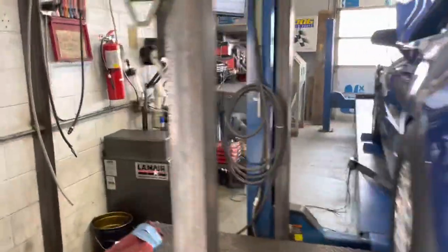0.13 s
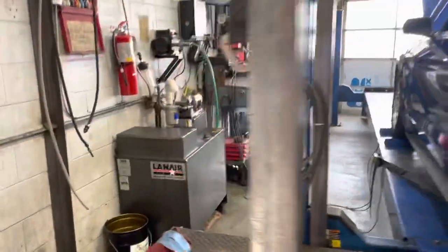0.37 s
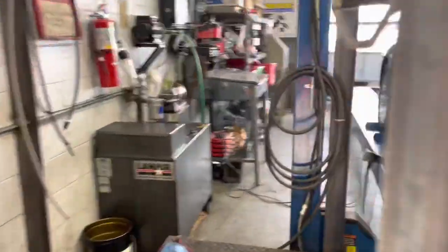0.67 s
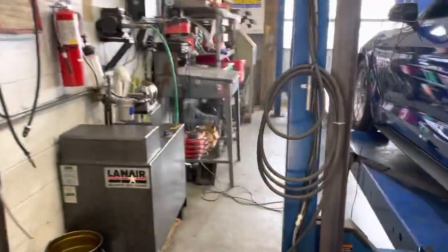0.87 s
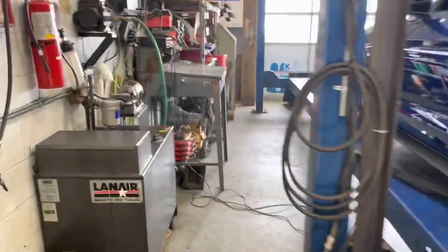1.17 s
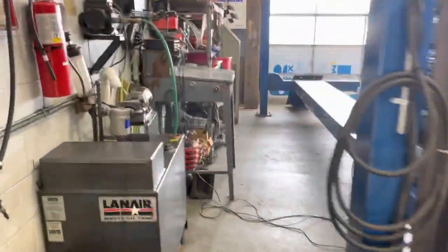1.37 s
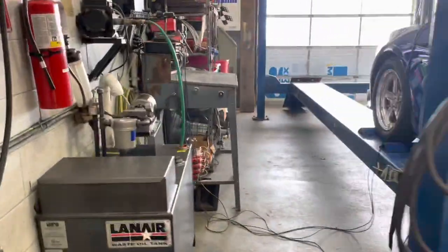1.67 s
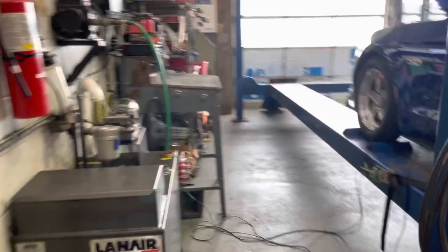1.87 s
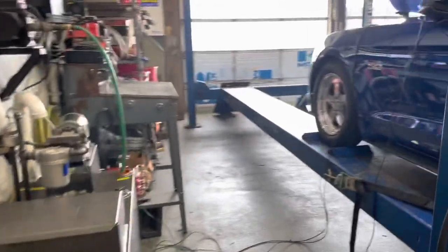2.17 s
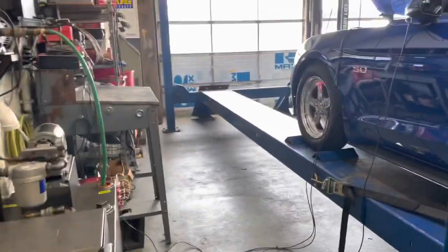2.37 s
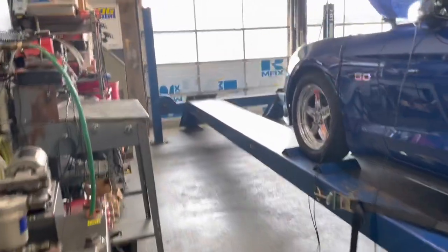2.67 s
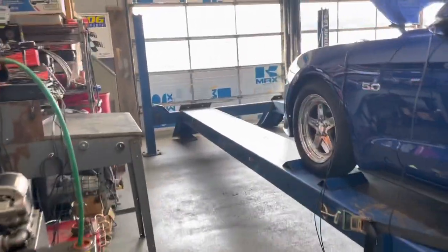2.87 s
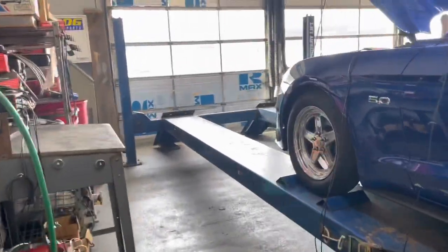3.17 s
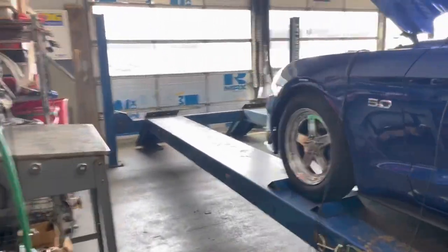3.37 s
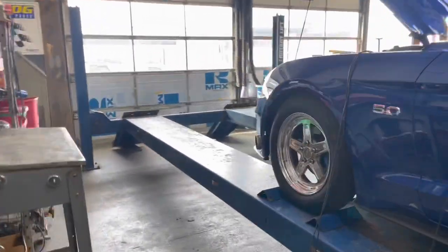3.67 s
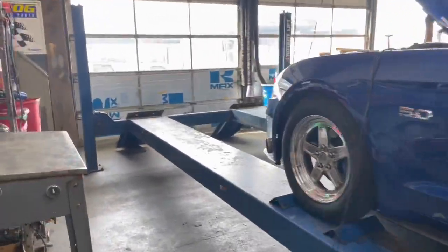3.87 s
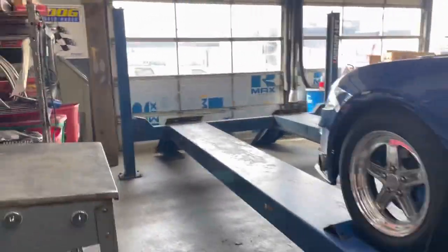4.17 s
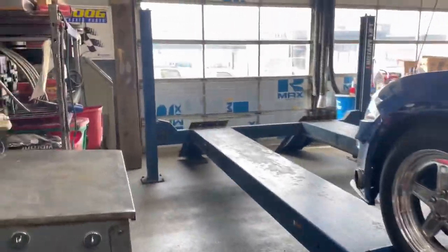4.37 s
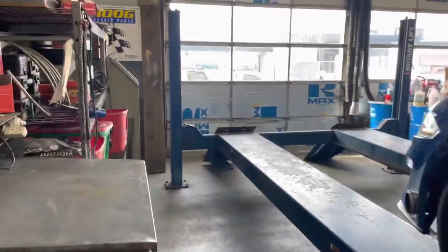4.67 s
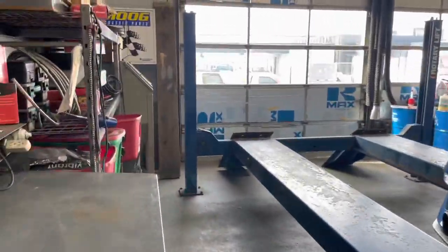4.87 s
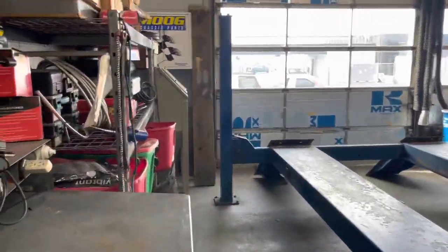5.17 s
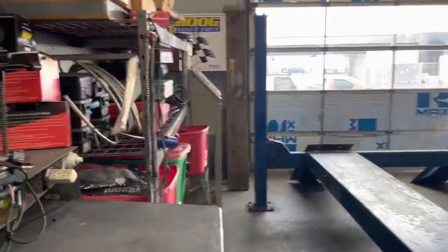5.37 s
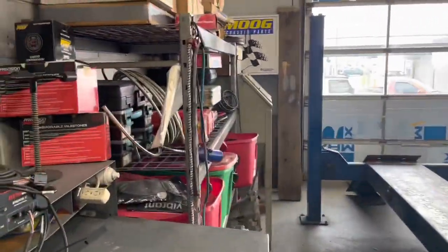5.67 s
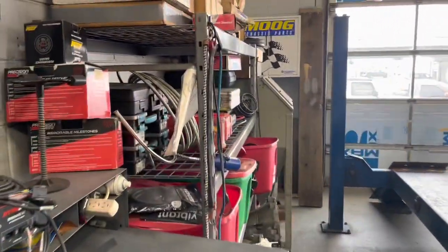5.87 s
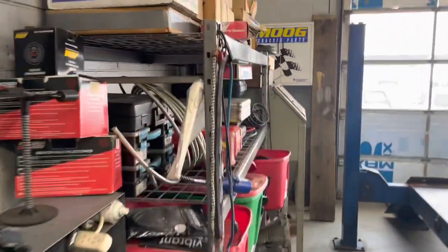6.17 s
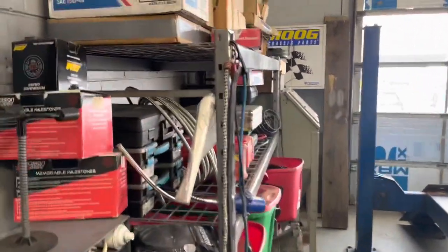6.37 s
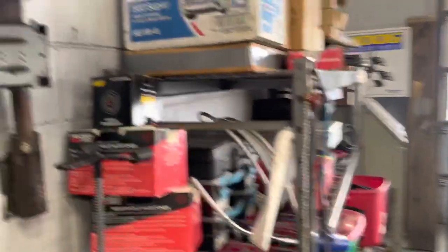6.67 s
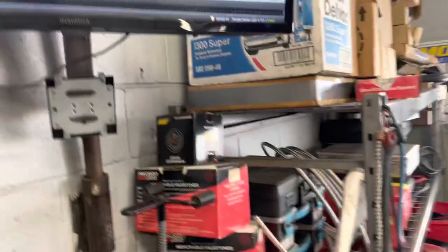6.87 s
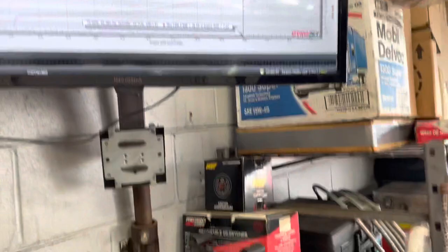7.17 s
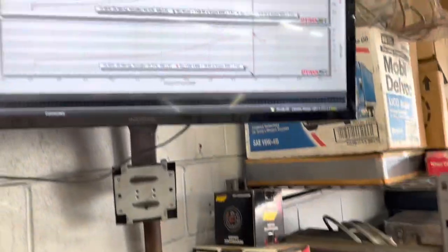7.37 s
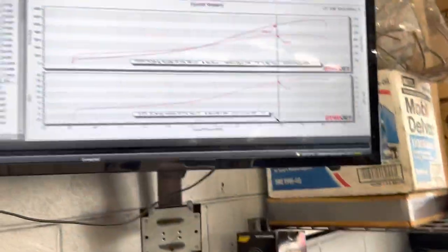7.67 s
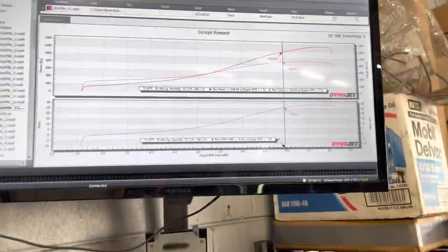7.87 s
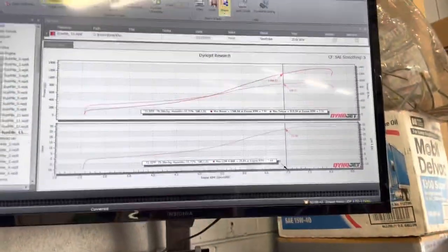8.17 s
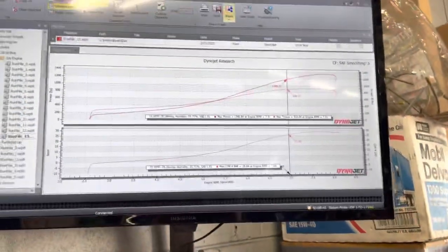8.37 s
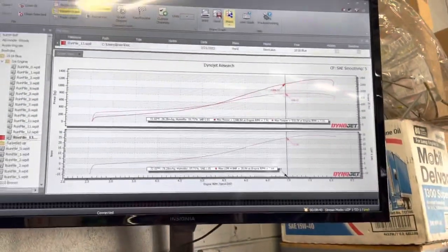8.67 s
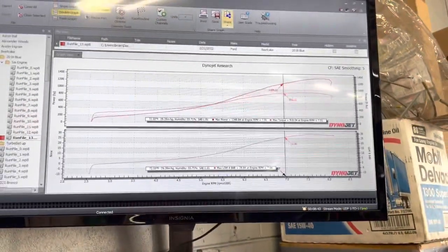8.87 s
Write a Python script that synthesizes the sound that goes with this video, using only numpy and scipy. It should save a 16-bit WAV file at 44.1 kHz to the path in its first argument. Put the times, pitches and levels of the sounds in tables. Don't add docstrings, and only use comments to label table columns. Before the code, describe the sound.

Handheld stereo microphone walking through a reverberant garage: low, lumpy V8 idle with a soft mechanical rush and faint steady fan tones. Compressed air vents sharply near the start and fades over a few seconds. The bass gradually strengthens, tiny bright ticks scatter, the engine revs slightly with a firm knock nearby, then falls back to a deep, loud burble and one late dull knock.

```python
import sys
import numpy as np
from scipy import signal
from scipy.fft import rfft, irfft, next_fast_len
from scipy.io import wavfile

SR = 44100
rng = np.random.default_rng(int(sys.argv[2]) if len(sys.argv) > 2 else 0)


def boost(x):
    u = np.asarray(x, float) / 20
    return 10 ** u


def file_out(sig):
    cols = np.atleast_2d(sig).T
    lim = np.clip(cols, -1, 1)
    pcm = np.round(lim * 32767).astype(np.int16)
    wavfile.write(sys.argv[1], SR, pcm)


N = 398223
T = np.arange(N) / SR
TURN_S = (4.2, 5.4)
IDLE_PER_S = 7.3


STRONG_ORDERS = [5, 8, 11, 16, 19, 21, 24, 27, 32]
# facing level/dB, turned away level/dB
ORDER_SIDES = [(-33, -26.5), (-36, -23), (-30, -13), (-15.5, -6), (-9.5, -7), (-6, -5), (-2, -3),
               (-2.5, -17), (-18, -18.5)]
# t/s, lag/rad
SIDE_LAG = [(0, 1.7), (2.7, 2.7), (3.2, 1.8), (4.3, 1.95), (4.8, 2.5), (9.03, 3.35)]


def exhaust_orders(cycles, levels_db):
    mid, side = 0, 0
    lag = in_time(SIDE_LAG)[0]
    turned = np.interp(T, TURN_S, [0, 1])
    pattern = np.angle(np.fft.fft(np.sign(CYLINDERS) + .5))
    for order, db, (facing_db, away_db) in zip(STRONG_ORDERS, levels_db, ORDER_SIDES):
        smear = .007 * order ** 2
        wander = .35 * drift(.3) + .08 * drift(4.0)
        angle = 2 * np.pi * order * cycles + pattern[order % 8] + smear + wander
        line = np.sqrt(2) * boost(db - 0.63 + 0.78 * drift(21.0))
        side_db = facing_db + turned * (away_db - facing_db)
        mid = mid + line * np.cos(angle)
        side = side + line * boost(side_db) * np.cos(angle - lag)
    return ports(mid, side)


# t/s, place along the shop [m], exhaust level/dB
WALK = [(0.0, 0.8, -11.5), (0.6, 1.15, -9.5), (1.3, 1.96, -3), (2.0, 1.92, -4), (2.8, 2.6, -6.5),
        (3.5, 3.26, -4.5), (4.3, 3.93, -2), (4.9, 4.72, 0.3), (5.5, 5.12, 1.4), (6.2, 5.39, 1.6),
        (6.6, 6.06, 0.5), (7.0, 6.67, 6.5), (7.3, 6.84, 10), (7.65, 6.84, 10.5), (8.0, 6.84, 7.5),
        (8.3, 6.81, 7.5), (8.7, 6.86, 10.5), (9.03, 6.84, 12)]
# f/Hz, width f/Hz, level/dB over direct, half wave along the walk [m], a crest at [m]
ROOM_MODES = [(41.1, 3.2, 22.5, 4.07, 5), (51.7, 7.2, 24.5, 4.457, -0.09), (71.9, 11.8, 22.5, 4.19, -8),
              (82.3, 7.3, 21.5, 1.83, -1.32), (106, 5.47, 23, 2.11, -0.37), (135.1, 7, 17, 2.337, 1.2),
              (138.4, 16, 13, 4.4, 4.5), (169.6, 8.2, 21.46, 2.803, 3), (178.23, 18.5, 24, 5.99, 5.5),
              (184.1, 33.9, 25, 6.02, -0.7), (199, 30, 13.5, 2.078, -1.32),
              (250.3, 22.2, 15.5, 2.626, -2.5)]
# order [multiples of the cycle rate], level/dB
DIRECT = [(5.0, -51.5), (8.0, -43), (11.0, -53.5), (16.0, -31.5), (19.0, -38.0), (21.0, -44), (24.0, -46),
          (27.0, -44.5), (32.0, -42.5)]


def standing_waves(speed):
    hop = 200
    place, gain_db = (c[::hop] for c in in_time(WALK))
    levels_db = []
    for order, db in DIRECT:
        hz = order * speed[::hop]
        field = 1
        for mode_hz, width, lift_db, half, crest in ROOM_MODES:
            shape = np.cos(np.pi * (place - crest) / half)
            field = field + boost(lift_db) * shape / (1 + 2j * (hz - mode_hz) / width)
        heard_db = db + gain_db + 20 * np.log10(np.abs(field) + 1e-3)
        levels_db.append(np.interp(T, T[::hop], heard_db))
    return levels_db


CYLINDERS = [0.85, -0.58, -1.134, 0.6, -1.106, 1.356, 0.59, -0.81]


def firings(cycles, rough):
    count = np.floor(8 * cycles).astype(int)
    at = np.flatnonzero(np.diff(count)) + 1
    clicks = np.zeros(N)
    clicks[at] = np.array(CYLINDERS)[count[at] % 8] + rough * rng.standard_normal(800)[:len(at)]
    return clicks


# t/s, level/dB, growl above 230 Hz level/dB
BURBLE = [(0, -38, -5.5), (.8, -32.5, -4.5), (1.3, -29.5, -11), (2.4, -21.5, -20), (2.7, -23, -14.5),
          (3.6, -21.5, -11.5), (4.3, -24, -5), (4.85, -16.5, -11.5), (5.6, -10.5, -23), (6.2, -9, -30),
          (6.5, -6, -24.5), (7.1, -10.5, -21.5), (7.5, -13.5, -20.5), (8.2, -12, -23.5), (9.03, -12.5, -23)]
# f/Hz, level/dB per Hz
BURBLE_COLOUR = [(20, -60), (32, -26), (60, -10.5), (95, -13), (130, 0), (200, 2), (250, -1.5), (330, -7.5),
                 (400, -14), (440, -24.5), (500, -23.5), (580, -32.5), (800, -60.5)]
# f/Hz, level/dB
BURBLE_SIDE = [(30, -27), (60, -18), (130, -1), (250, 0), (500, 23), (1200, -4.5)]
BURBLE_TOP_DB, BURBLE_SIDE_DB = 1.5, (-12.5, -5.5)
TAILPIPE_HIDDEN_S, TAILPIPE_HIDDEN_DB = (3.9, 4.3, 5.7, 6.2), (0, -15, -15, -7)
BASS_DB, BASS_FOLLOWS = -23, 0.38


def burble(clicks):
    low_db, growl_db = in_time(BURBLE)
    hidden_db = np.interp(T, TAILPIPE_HIDDEN_S, TAILPIPE_HIDDEN_DB)
    bass_db = BASS_DB + BASS_FOLLOWS * (low_db - low_db.mean())
    top_db = in_time(BAY)[0] + BURBLE_TOP_DB + hidden_db
    levels_db = (bass_db, low_db, low_db + growl_db, top_db)
    side_db = np.interp(T, TURN_S, BURBLE_SIDE_DB)
    uneven = clicks - .9 * np.sign(clicks)
    clicks = 1.6 * split(uneven, 250)[0] + split(clicks, 250)[1]

    def in_room():
        return rms_one(walking_room(clicks, t60=0.35, count=9)) + 0.18 * rms_one(clicks)

    mid, own = in_room(), in_room()
    trims_db = [-13, -11.5, -1.5, -2.5]
    out = []
    for field, spectra in ((mid, [BURBLE_COLOUR]), (own - 0.14 * mid, [BURBLE_COLOUR, BURBLE_SIDE])):
        bands = split(colour(field, *spectra), 105, 228.7, 437)
        out.append(sum(boost(db + trim) * rms_one(b) for db, trim, b in zip(levels_db, trims_db, bands)))
    return ports(out[0], out[1] * boost(side_db))


# t/s, level/dB
BAY = [(0, -48.5), (1.3, -50.5), (2, -47.5), (2.85, -47), (4.3, -41.5), (5.3, -40), (6.25, -39.5),
       (6.75, -36.5), (7, -37), (7.65, -38.5), (9.03, -36)]
# f/Hz, level/dB per Hz
BAY_MID = [(380, -6), (650, -3), (1050, -5), (1440, -10.5), (2180, -11), (3520, -8.5), (4770, -9),
           (8020, -20), (8680, -31), (10600, -33.5), (13500, -38), (15600, -44)]
# f/Hz, level/dB per Hz
BAY_SIDE = [(380, 1.5), (650, 0), (1050, -0.5), (2920, -16.5), (5170, -18.5), (6740, -20.5), (10600, -27),
            (12300, -44.5), (13800, -71.5), (15600, -80)]
BAY_TREBLE_DB, BAY_AIR_DB = (-8.5, -13), (-19, -21.5)
SHELVES_S = (6.46, 8.1)
REV_HISS_DB = 2.5


def engine_bay(clicks, speed):
    near_db = in_time(BAY)[0]
    treble_db = near_db + np.interp(T, SHELVES_S, BAY_TREBLE_DB)
    air_db = near_db + np.interp(T, SHELVES_S, BAY_AIR_DB) + REV_HISS_DB * (speed - IDLE_PER_S)
    levels_db = (near_db, treble_db, air_db)
    decay = np.exp(-1 / (0.018 * SR))
    puff = rms_one(signal.lfilter([1], [1, -decay], np.maximum(clicks, 0)))
    pair = noise_pair(t60=.15, wet=.4)
    trims_db = ([0, -1.7, 0.82], [2.5, -1.6, 0.5])
    out = []
    for noise, spectrum, extras_db in zip(pair, (BAY_MID, BAY_SIDE), trims_db):
        bands = split(colour(noise, spectrum), 2384, 10600)
        total = 0
        for db, extra, band, depth in zip(levels_db, extras_db, bands, [.13, .17, .21]):
            level = boost(db + extra + 0.74 * drift(10.2))
            total = total + level * rms_one(band) * (1 + depth * (puff - .7))
        out.append(total)
    return ports(*out)


# f/Hz, level/dB per Hz
VENT_MID = [(1180, -35), (2000, -15.5), (3070, -14.5), (4840, -3.5), (5650, -7.5), (6830, -3), (8180, -1),
            (8610, -17.5), (9070, -6.5), (10800, -5), (13000, -0.5), (15600, -5.5)]
# f/Hz, level/dB per Hz
VENT_SIDE = [(1180, -55), (2000, -35.5), (2720, -23), (3650, -14), (8910, -1.5), (12500, -10), (13200, -16),
             (13800, -69), (15600, -83)]
# f/Hz, width f/Hz, level/dB
VENT_WHISTLES = [(4900, 220, -2.5), (5330, 44, 3), (6360, 65, -6.5)]
VENT_S, VENT_ATTACK_S, VENT_HOLD_S, VENT_DB, VENT_FALL_DB_PER_S = 0.29, 0.05, .55, -32, 17
LEAK_DB, LEAK_SHUT_S = -64, (3.84, 4.5)


def air_valve():
    age = T - VENT_S
    level = boost(VENT_DB - VENT_FALL_DB_PER_S * np.maximum(age - VENT_HOLD_S, 0))
    level = level + boost(LEAK_DB) * np.interp(T, LEAK_SHUT_S, [1, 0])
    level = level * np.clip(age / VENT_ATTACK_S, 0, 1) ** 1.5 * boost(1.2 * drift(2.6))
    whistles = 1
    for hz, width, db in VENT_WHISTLES:
        whistles = whistles + boost(db - 2.0) / (1 + (2 * (BINS_HZ - hz) / width) ** 2)
    low_lift = boost(6.24 * np.clip(T - .8, 0, 2))
    pair = noise_pair(t60=.08, wet=.3)
    out = []
    for noise, spectrum, db in zip(pair, (VENT_MID, VENT_SIDE), (0, -1.5)):
        jet = from_bins(to_bins(noise) * whistles)
        low, high = split(rms_one(colour(jet, spectrum)), 8504)
        out.append(level * boost(db) * (low * low_lift + high))
    return ports(*out)


# t/s, peak level/dB
TICKS = [(4.3406, -45), (4.679, -46.5), (5.0344, -46.5), (5.0858, -44), (5.157, -50), (5.3073, -38),
         (5.3595, -51), (5.445, -45), (5.5807, -39.5), (5.6145, -42), (5.7019, -52), (5.7505, -43),
         (5.8516, -46), (5.8865, -44), (5.904, -45), (5.9377, -44), (5.9883, -42), (6.124, -46.5),
         (6.552, -46), (7.0504, -46.5)]
# t/s, peak level/dB, f/Hz
KNOCKS = [
    (6.7465, -18.5, 1200),
    (6.81, -29, 1550),
    (6.862, -37, 4300),
    (8.7305, -24.5, 950),
]


def ticks_and_knocks():
    puffs = 0
    for s, db in TICKS:
        age = np.maximum(T - s, 0) + 9 * (T < s)
        puffs = puffs + boost(db - 5.5 - 60 * age / 0.0069) + boost(db - 8.5 - 60 * age / 0.098)
    tick_colour = [(8500, -46.5), (9800, 0.5), (11500, 2.0), (13500, -9.0), (15000, -28.0)]
    ticks = puffs * rms_one(colour(rng.standard_normal(N), tick_colour))
    knocks = sum(ring(s, db, hz, t60=0.012) for s, db, hz in KNOCKS)
    return ports(ticks + knocks, .6 * np.roll(ticks, 3) + .4 * knocks)


# f/Hz, overtone level/dB, side level/dB, side growth per dB of nearness
FAN_A_TONE, FAN_B_TONE = (606, -58, -50.5, 2.5), (560, -66, -53, 1.7)
# start t/s, length t/s, level/dB
FAN_A_CLEAR = [(0, 0.76, -61.5), (0.947, 0.76, -55), (1.9, .7, -66), (3.11, 0.51, -59),
               (3.607, 0.41, -47.5), (4.05, .35, -47), (4.69, 2.05, -46.5), (6.9, 0.54, -50),
               (8.35, 0.22, -54)]
# start t/s, length t/s, level/dB
FAN_B_CLEAR = [
    (1.25, 2.5, -62),
    (3.9, 0.39, -44),
    (4.95, 1.3, -44.5),
    (7.0, 0.22, -47.5),
]
FAN_EDGE_S, FAN_HIDDEN_DB = 0.12, -69


def fan(tone, clear, overtone):
    hz, over_db, side_db, growth = tone
    near_db = in_time(BAY)[0] + 42
    over_db = over_db + 0.92 * near_db + 4.1 * drift(.8)
    side_db = side_db + growth * near_db + 2.5 * drift(2.0)
    heard = boost(FAN_HIDDEN_DB)
    for s, length, db in clear:
        inside = np.minimum(T - s, s + length - T)
        heard = heard + boost(db) * np.clip(inside / FAN_EDGE_S + .5, 0, 1)
    angle = 2 * np.pi * hz * T + 0.5 * drift(2.6)
    mid = heard * boost(2.5 * drift(5.0)) * np.cos(angle) + boost(over_db) * np.cos(overtone * angle)
    side = boost(side_db) * np.sin(angle) + boost(over_db - 7.0) * np.sin(overtone * angle)
    side = side + boost(side_db - 8.0) * np.sin(3 * angle)
    return np.sqrt(2) * ports(mid, side)


def walking_room(x, t60, count=5):
    t = np.arange(SR // 2) / SR
    tails = rng.standard_normal((count, len(t))) * boost(-60 * t / t60)
    out, step = np.zeros(N), N // (count - 1) + 1
    for k, tail in enumerate(tails):
        near = np.arange(max((k - 1) * step, 0), min((k + 1) * step, N))
        start = max(near[0] - len(t), 0)
        heard = signal.fftconvolve(x[start:near[-1] + 1], tail)[near - start]
        out[near] += heard * np.cos(np.pi / 2 * (near / step - k))
    return out


# f/Hz, likeness to the mid [0-1], lead [rad]
ARRIVAL = [(500, .3, -2), (1500, 0.02, -3.5), (3000, 0.4, 0.4), (6000, 0.55, -0.6), (8000, .4, -1.5),
           (12000, .2, -1.5)]


def noise_pair(t60, wet):
    white = rng.standard_normal((2, N))
    mid, own = (to_bins(w + wet * rms_one(walking_room(w, t60, count=12))) for w in white)
    hz, like, lead = np.transpose(ARRIVAL)
    like = np.interp(BINS_HZ, hz, np.clip(like, 0, 1))
    lead = np.interp(BINS_HZ, hz, lead)
    side = like * np.exp(1j * lead) * mid + np.sqrt(1 - like ** 2) * own
    return from_bins(mid), from_bins(side)


def ring(at_s, db, hz, t60):
    t = np.maximum(T - at_s, 0)
    return boost(db - 60 * t / t60) * np.sin(2 * np.pi * hz * t)


def ports(mid, side):
    return np.array([mid + side, mid - side])


def rms_one(x):
    return x / np.sqrt(np.mean(x ** 2) + 1e-20)


def in_time(rows):
    s, *columns = np.transpose(rows)
    return [np.interp(T, s, c) for c in columns]


def drift(rate_hz):
    hop, settle = 40, 4000
    r = np.exp(-2 * np.pi * rate_hz * hop / SR)
    chance = rng.standard_normal(N // hop + settle + 2)
    slow = signal.lfilter([1], [1, -2 * r, r * r], chance)[settle:]
    return np.interp(np.arange(N) / hop, np.arange(len(slow)), rms_one(slow - slow.mean()))


def colour(x, *spectra):
    db = 0
    for spectrum in spectra:
        hz, level_db = np.transpose(spectrum)
        db = db + np.interp(np.log(BINS_HZ), np.log(hz), level_db)
    return from_bins(to_bins(x) * boost(db))


def split(x, *edges_hz):
    spec = to_bins(x)
    below = [0] + [1 / (1 + (BINS_HZ / e) ** 8) for e in edges_hz] + [1]
    return [from_bins(spec * (b - a)) for a, b in zip(below, below[1:])]


MARGIN = 4096
FFT_SIZE = next_fast_len(N + 2 * MARGIN)
BINS_HZ = np.maximum(np.fft.rfftfreq(FFT_SIZE, 1 / SR), 1)


def to_bins(x):
    return rfft(np.pad(x, (MARGIN, FFT_SIZE - N - MARGIN), "reflect"))


def from_bins(spec):
    return irfft(spec, FFT_SIZE)[MARGIN:MARGIN + N]


# t/s, four-stroke cycle rate f/Hz
SPEED = [(0, 8.42), (.2, 8.55), (.4, 8.51), (.7, 7.99), (1.0, 7.61), (1.5, 7.39), (2, 7.34), (3.5, 7.27),
         (5, 7.35), (6.1, 7.29), (6.3, 7.48), (6.55, 7.97), (6.8, 7.98), (7.05, 8.32), (7.3, 7.95),
         (7.65, 7.1), (8.0, 6.97), (9.03, 7.19)]


def scene():
    speed = in_time(SPEED)[0]
    cycles = .44 + np.cumsum(speed) / SR
    clicks = firings(cycles, rough=.11)
    exhaust = exhaust_orders(cycles, standing_waves(speed)) + burble(clicks)
    engine = exhaust + engine_bay(clicks, speed)
    fans = fan(FAN_A_TONE, FAN_A_CLEAR, overtone=2) + fan(FAN_B_TONE, FAN_B_CLEAR, overtone=3)
    return engine + air_valve() + fans + ticks_and_knocks()


# f/Hz, level/dB
PORT_NOTCH = [(6800, 1), (7700, -6), (8300, -9), (9300, -6.5), (10000, 0), (10800, 1), (13500, 0.5),
              (14500, -4), (15700, 3)]


def low_pass(x):
    return signal.sosfilt(signal.butter(12, 15730, fs=SR, output="sos"), x)


def record(dry):
    heard = ports(colour(dry.mean(0), PORT_NOTCH), (dry[0] - dry[1]) / 2)
    return low_pass(1.407 * np.tanh(heard / 1.392))


dry = scene()
out = record(dry)
file_out(out)
```